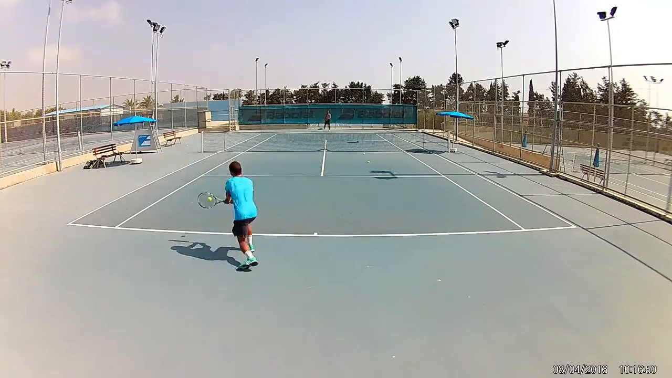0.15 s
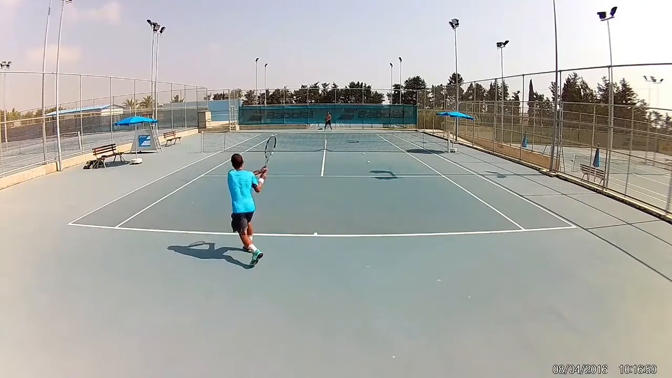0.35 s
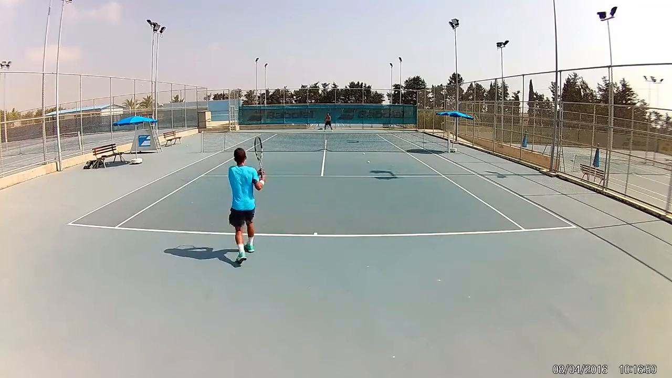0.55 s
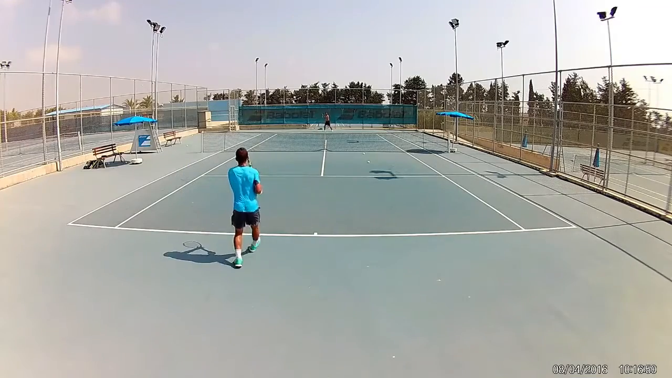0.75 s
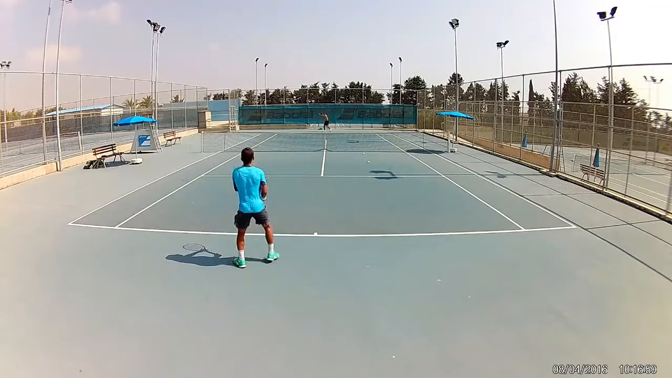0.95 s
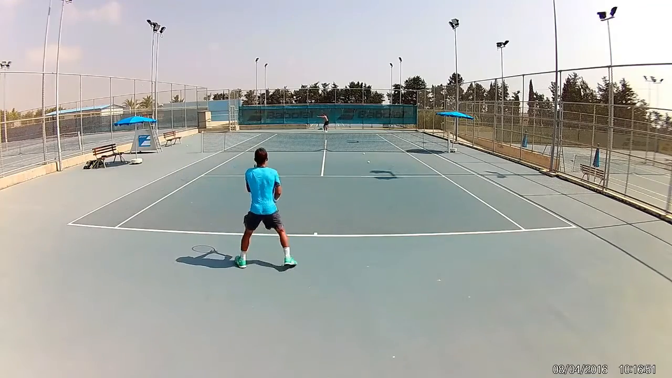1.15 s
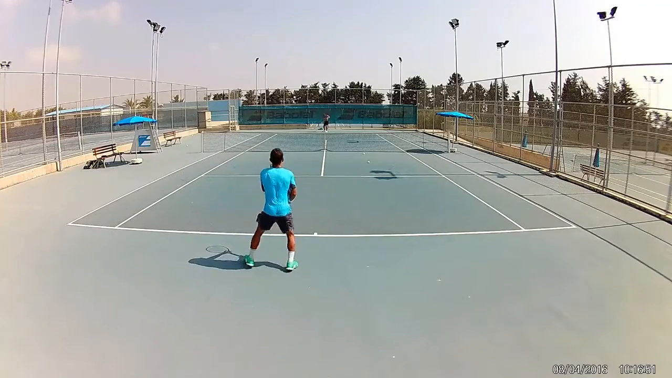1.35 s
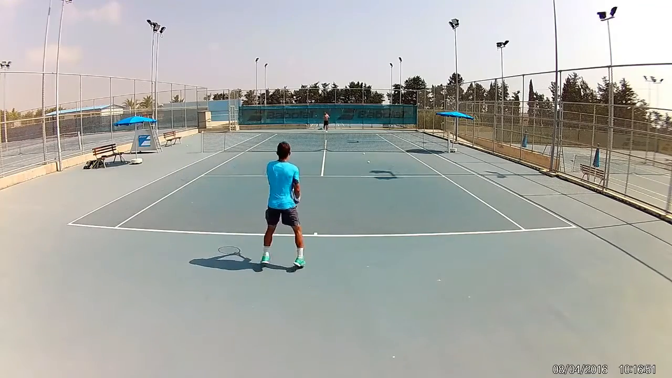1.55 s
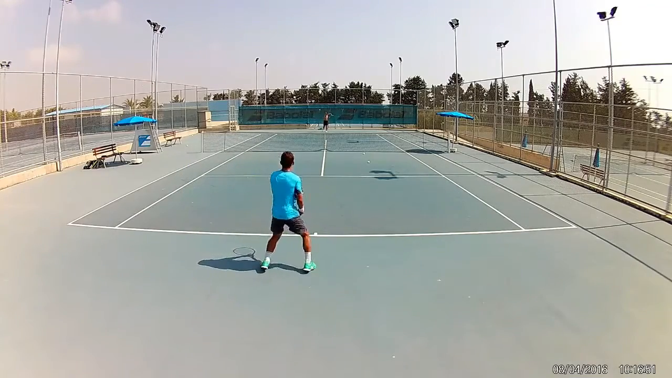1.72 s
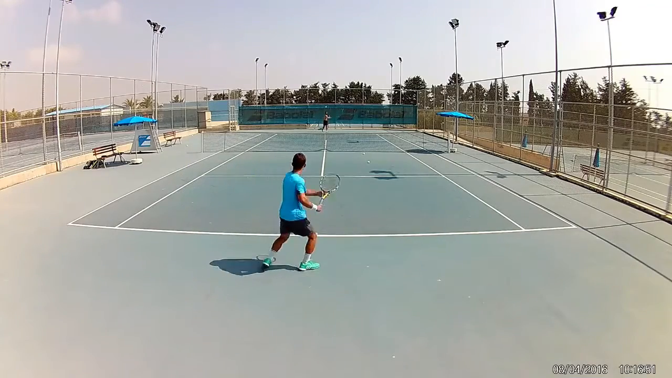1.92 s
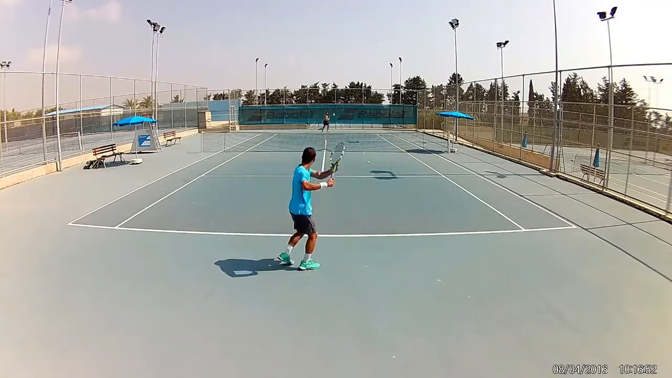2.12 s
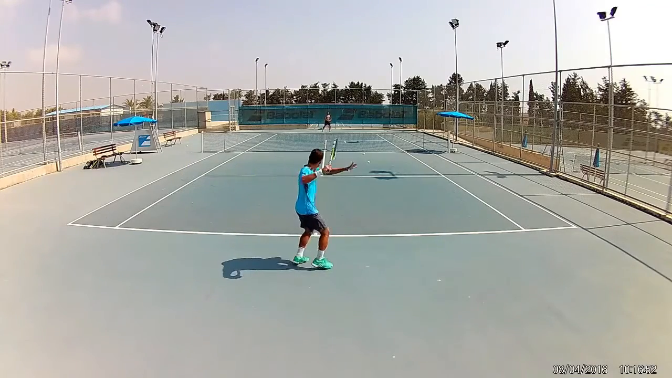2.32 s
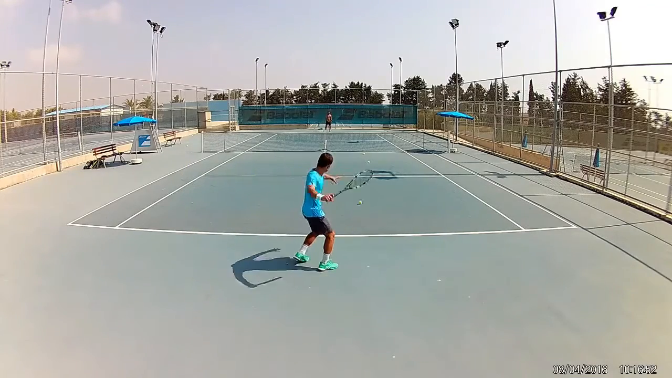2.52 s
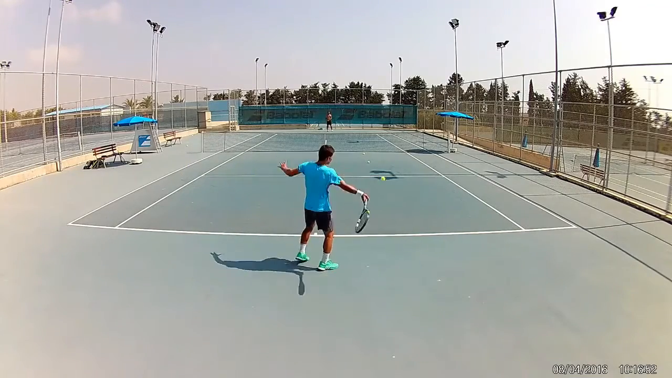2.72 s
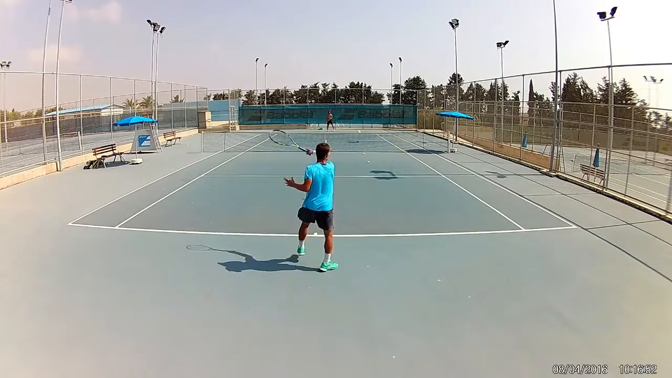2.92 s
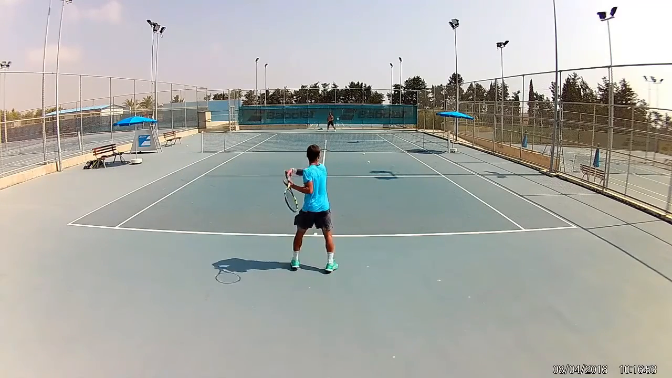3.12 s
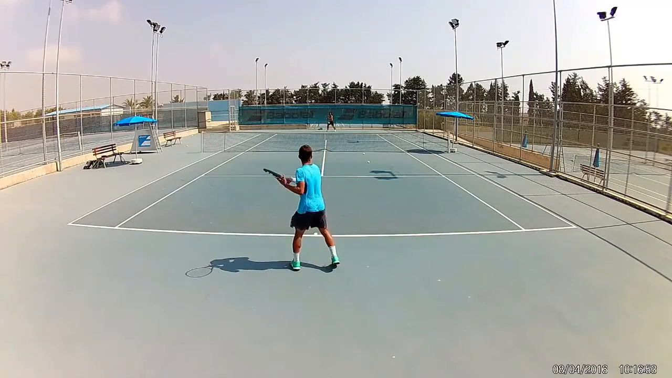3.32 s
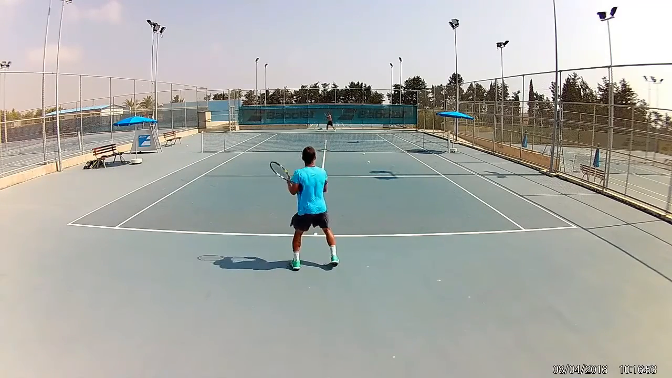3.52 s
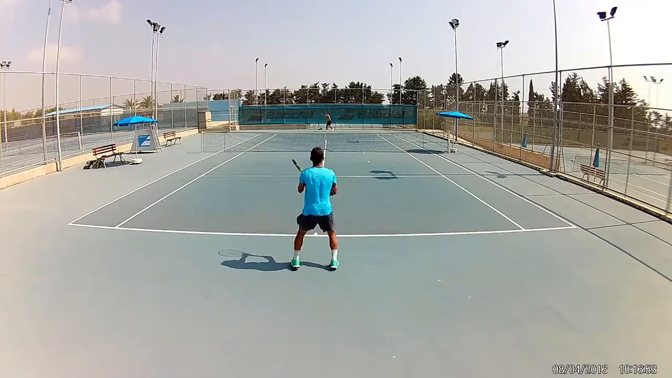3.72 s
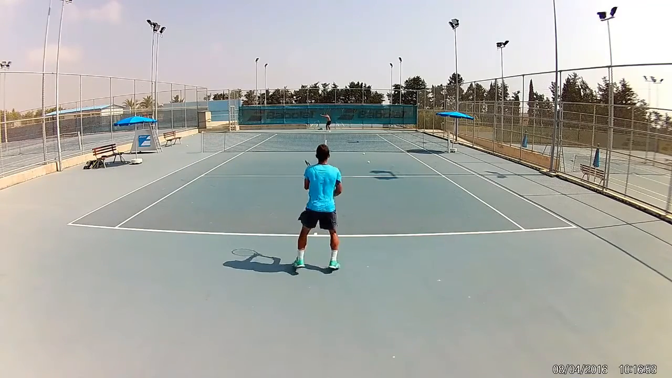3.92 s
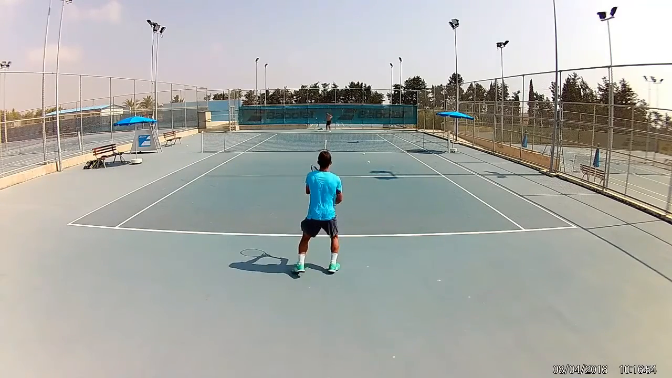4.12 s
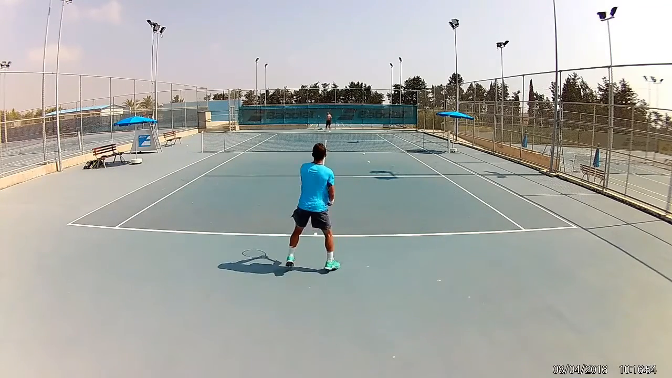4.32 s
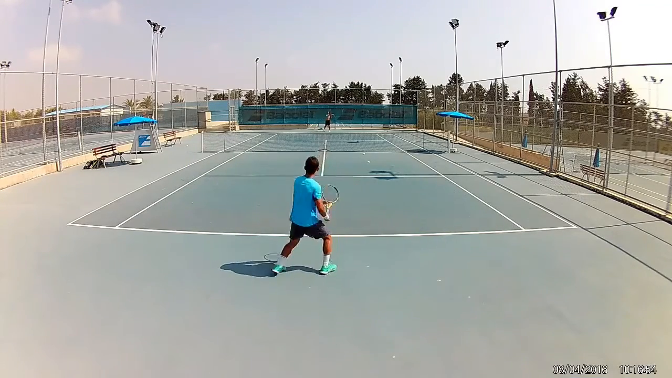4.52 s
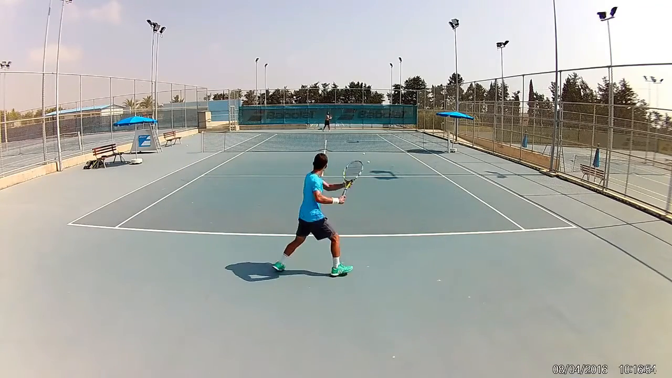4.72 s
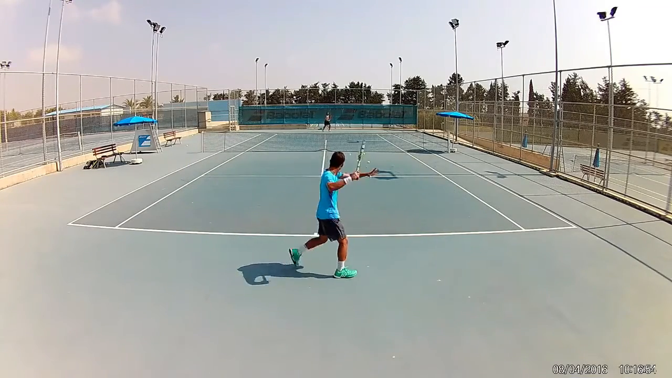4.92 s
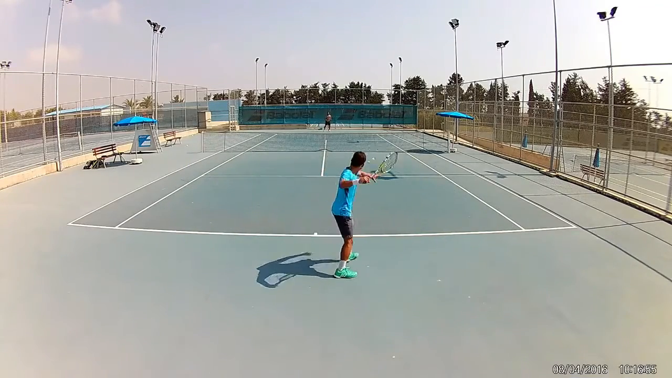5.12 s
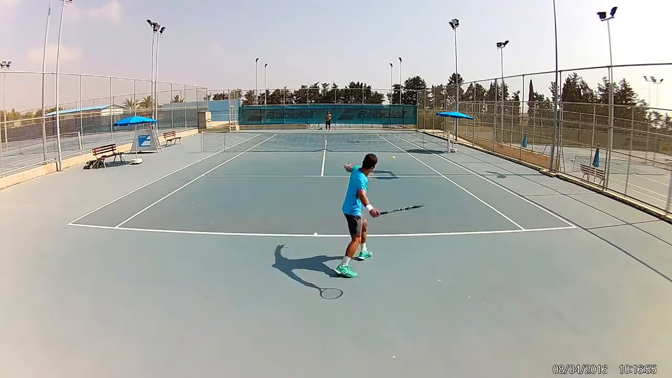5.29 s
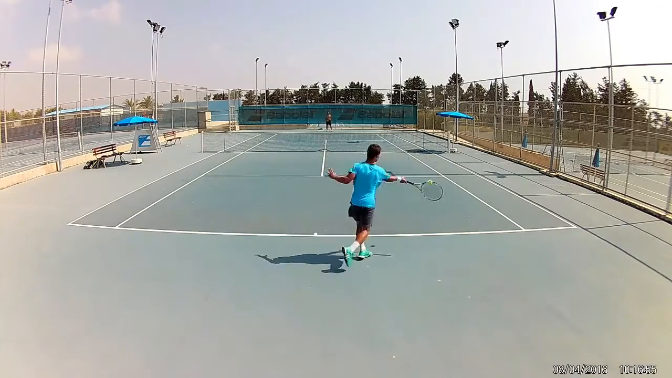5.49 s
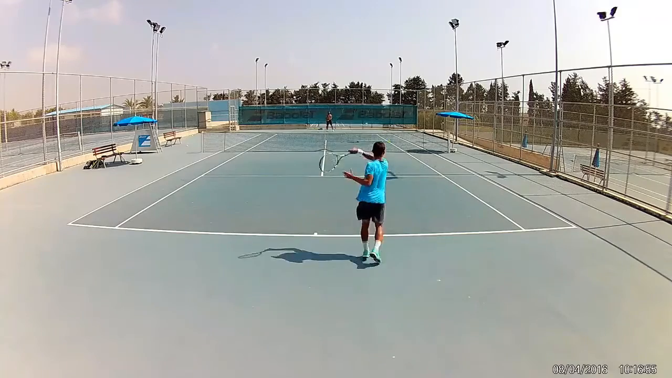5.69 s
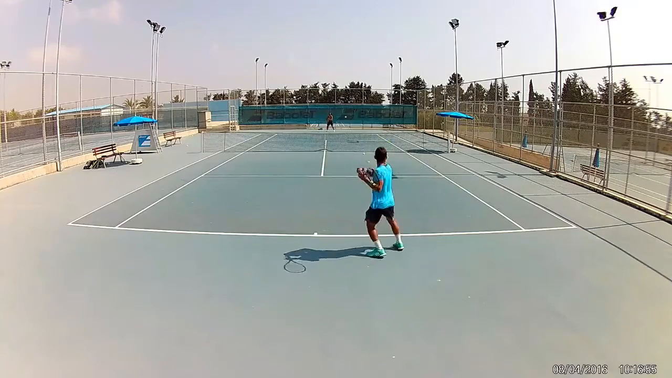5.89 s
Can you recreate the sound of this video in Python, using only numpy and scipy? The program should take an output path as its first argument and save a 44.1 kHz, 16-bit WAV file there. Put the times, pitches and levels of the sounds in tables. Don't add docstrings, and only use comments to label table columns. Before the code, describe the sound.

Heard from behind the near baseline of an outdoor hard court, a close backhand pops early, a duller far stroke answers, then a bounce and a sharp forehand. The exchange repeats with a softer return and bounce. Shoes thud, tap and scuff between hits while low wind buffets the microphone over faint cicadas and distant traffic.

```python
import sys
import numpy as np
from scipy import signal
from scipy.fft import rfft, irfft
from scipy.io import wavfile
from scipy.ndimage import uniform_filter1d

SR = 44100
rng = np.random.default_rng(int(sys.argv[2]) if len(sys.argv) > 2 else 0)


def store_wav(level_fs):
    pcm = np.round(np.clip(np.atleast_2d(level_fs), -1, 1) * 32767)
    wavfile.write(sys.argv[1], SR, pcm.T.astype(np.int16))


def nominal_scale(level):
    x = np.asarray(level, float) / 20
    return 10 ** x


N = 262395

# t/s, kind of blow, level/dB, shell f/Hz, cavity f/Hz, string f/Hz
RALLY = [
    (.3487, "backhand", -18.5, 245, 865, 3260),
    (1.7285, "far stroke", -20.5, 468, 975, 6270),
    (2.6903, "bounce", -25, 306, 1150, 2300),
    (2.9682, "forehand", -18, 335, 765, 4250),
    (4.4678, "far stroke", -25, 430, 900, 6200),
    (5.1813, "bounce", -31.5, 450, 1150, 1800),
    (5.7257, "forehand", -18, 429, 810, 3820),
]
BLOW_MODES = {"backhand": (-4.5, 1.18, -1, -7.5, -21.5), "forehand": (4.5, 1.46, -5, -4, -22),
              "far stroke": (3.5, 1.35, -10, -26, -31), "bounce": (-3.5, .58, -16.5, -20, -35)}
CONTACTS = {"backhand": (1.8, 5.6, 53, .74), "forehand": (3.2, 2.6, 60.5, .78),
            "far stroke": (4.3, 6.0, 70, 1.2), "bounce": (.9, 4.9, 60, .74)}
TOUCHES = {"backhand": (.12, 2.8, 11, 5000), "forehand": (.2, 3.5, 4, 2100), "bounce": (.1, 2.2, .6, 2700),
           "far stroke": (.08, 2.4, 9, 1800)}
REFLECTIONS = {"backhand": (6.5, -13.5, -27, -29, -29), "forehand": (3.5, -17.5, -20.5, -34, -29),
               "far stroke": (-27.5, -0.7, -21.5, -48, -19), "bounce": (-8.5, -8, -22, -39, -31.5)}
RIBS = {"backhand": (1013, -39), "forehand": (950, -42.5), "far stroke": (1010, -49), "bounce": (1110, -46)}


def ball():
    out = np.zeros(N)
    for s, kind, db, shell_hz, cavity_hz, string_hz in RALLY:
        shell_db, upper_ratio, upper_db, crack_db, string_db = BLOW_MODES[kind]
        swell_ms, court_ms, side_ms, spring = CONTACTS[kind]
        linger, *snap = TOUCHES[kind]
        court_db, *wall_dbs = REFLECTIONS[kind]
        far_hz, flutter_db = RIBS[kind]
        upper_hz = upper_ratio * cavity_hz
        body = blow(shell_hz, shell_db, cavity_hz, upper_hz, upper_db, swell_ms, spring, linger)
        add(body, court_ms / 1000, nominal_scale(court_db) * body)
        hit = nominal_scale(db) * (body + crack(crack_db, string_hz, string_db, *snap))
        add(out, s, court(hit, side_ms, far_hz, *wall_dbs, flutter_db))
    return out


def blow(shell_hz, shell_db, cavity_hz, upper_hz, upper_db, swell_ms, spring, linger):
    t = np.arange(2048) / SR
    squash_s = .85 / shell_hz
    shell_swell = burst(t, spring * squash_s) ** max(2 * spring ** 2, 1)
    shell = -nominal_scale(shell_db) * shell_swell * np.cos(2 * np.pi * shell_hz * (t - squash_s))
    ring = burst(t, swell_ms / 1000) ** max(swell_ms / 2, 1)
    ring += linger * burst(t, 0.0067) ** 1.8
    cavity = ring * np.sin(2 * np.pi * cavity_hz * t)
    upper = nominal_scale(upper_db) * burst(t, .0016) * np.sin(2 * np.pi * upper_hz * t)
    return shell + cavity + upper


# f/Hz, level/dB
CRACK = [(500, -6), (1400, 11), (2200, 1.5), (3300, -19), (4500, -29), (6500, -21), (10000, -17.5),
         (12500, -20), (15500, -32)]


def crack(crack_db, string_hz, string_db, snap_ms, treble_db, treble_hz):
    snap_s = snap_ms / 1000
    t = np.arange(2048) / SR
    snap = burst(t, snap_s) ** 2 + .12 * burst(t, .007) ** .7
    spectrum = [(hz, db + treble_db * (hz > treble_hz)) for hz, db in CRACK]
    felt = nominal_scale(crack_db) * noise(spectrum, size=2048)
    string = nominal_scale(string_db) * unit(resonance(rng.standard_normal(len(t)), string_hz, 360))
    return snap * (felt + string)


# f/Hz, level/dB
SCATTER = [(120, -24), (300, 4.5), (550, 1.5), (900, 3), (1450, -6), (2000, -15.5), (4000, -33),
           (7000, -36), (15000, -53)]


def court(hit, side_ms, far_hz, fence_db, side_db, far_db, scatter_db, flutter_db):
    fence_ms, far_ms = 38.6, 169
    t = np.arange(SR // 2) / SR
    walls = np.zeros(len(t))
    for ms, db in (fence_ms, fence_db), (side_ms, side_db), (far_ms, far_db):
        walls[int(ms * SR / 1000)] = nominal_scale(db)
    out = signal.fftconvolve(hit, resonance(walls, 710, 6000))[:len(t)]
    peak = np.abs(hit).max()
    grains = rng.standard_normal((2, len(t))) * (rng.random((2, len(t))) < .2)
    cloud = np.exp(-t / .05) + .2 * np.exp(-t / .13)
    cloud += .4 * np.exp(-((t - fence_ms / 1000 - .004) / .01) ** 2)
    onset = np.clip(t / 0.0028, 0, 1) ** 2
    out += peak * nominal_scale(scatter_db) * onset * cloud * unit(colour(grains[0], SCATTER))
    late_s = t - far_ms / 1000
    flutter = np.clip(t / .05, 0, 1) ** 2 * np.exp(-t / .12)
    flutter += .3 * (late_s > 0) * np.exp(-(late_s / .075) ** 4)
    pitched = unit(resonance(resonance(grains[1], far_hz, 200), far_hz, 200))
    out += peak * nominal_scale(flutter_db) * flutter * pitched
    add(out, 0, hit)
    return out


# t/s, kind of slide, length t/s, grit level/dB,
# squeak f/Hz, squeak level/dB
SCUFFS = [(0.25, "drag", 0.084, -74, 6850, -66), (0.257, "skid", 0.11, -64.5, 10000, -80),
          (0.093, "skid", .05, -77, 3600, -86), (0.762, "drag", 0.026, -65.5, 6500, -70),
          (2.204, "drag", 0.012, -53.5, 2000, -65), (2.346, "drag", 0.058, -57.5, 2570, -59.5),
          (2.513, "skid", 0.03, -70, 3630, -84), (2.856, "skid", 0.048, -73, 3620, -82),
          (3.213, "drag", 0.065, -59, 3880, -63), (4.068, "drag", 0.038, -63, 2960, -77),
          (4.883, "skid", .05, -75, 3270, -73), (5.409, "skid", 0.047, -51, 3600, -48),
          (5.412, "drag", 0.033, -50, 2070, -62), (5.46, "drag", 0.031, -60, 3500, -65),
          (5.818, "drag", 0.12, -76, 550, -48.5), (5.905, "skid", .035, -62, 3880, -74)]
GRIT = {"drag": (0.33, 1.1), "skid": (0.875, 1.27)}


def scuffs():
    out = np.zeros(N)
    t = np.arange(8192) / SR
    for s, kind, length_s, db, squeak_hz, squeak_db in SCUFFS:
        band_hz = squeak_hz * np.array(GRIT[kind])
        slide = np.exp(-(t / length_s) ** 3) + 0.17 * np.exp(-t / 0.037)
        slide *= np.clip(t / 0.0024, 0, 1)
        unevenness_db = 3.0 * rng.standard_normal(len(t) // 64).repeat(64)
        slips = rng.standard_normal(len(t)) * nominal_scale(unevenness_db)
        grit_filter = signal.butter(3, band_hz, "band", fs=SR, output="sos")
        grit = unit(signal.sosfilt(grit_filter, slips) + 0.053 * slips)
        catch = np.exp(-((t - .7 * length_s) / (.25 * length_s)) ** 2)
        squeak = unit(resonance(slips, squeak_hz, 76) + 0.28 * resonance(slips, 0.76 * squeak_hz, 120))
        add(out, s, nominal_scale(db) * slide * grit + nominal_scale(squeak_db) * catch * squeak)
    return out


# t/s, thud level/dB, thud f/Hz, tap level/dB, tap f/Hz
STEPS = [
    (1.009, -58, 65, -50, 670),
    (1.296, -52, 95, -36.5, 1010),
    (1.953, -31, 91, -36.5, 695),
    (2.35, -43, 100, -38, 1250),
    (3.658, -31, 99, -52, 573),
    (3.854, -41, 130, -35.5, 845),
    (4.697, -27.5, 67, -39, 513),
    (5.417, -56, 99, -50, 1550),
]


def steps():
    out = np.zeros(N)
    t = np.arange(8192) / SR
    for s, thud_db, thud_hz, tap_db, tap_hz in STEPS:
        thud = nominal_scale(thud_db) * mode(t, thud_hz, 5.4 / thud_hz)
        add(out, s, thud + nominal_scale(tap_db) * mode(t, tap_hz, 0.0074))
    return out


# t/s, level/dB
WIND = [(0.0, -41.5), (0.89, -41.5), (1.23, -45.5), (1.54, -51.5), (1.9, -49), (2.1, -55.5), (2.29, -57),
        (2.83, -53), (3.13, -48.5), (3.43, -51.5), (4.11, -53), (4.27, -51), (4.54, -49.5), (4.89, -52),
        (5.95, -46.5)]
# f/Hz, level/dB
RUMBLE = [(12, -54), (25, -1), (62, 3), (100, -6), (200, -36), (400, -27)]
# f/Hz, level/dB
FLUTTER = [(60, -1.5), (130, 2.5), (280, -5.5), (500, -12), (900, -21.5), (2000, -49)]


def wind():
    gust_db = curve(WIND, 1)
    rumble = nominal_scale(-17 + 0.63 * gust_db + 1.4 * walk(12)) * noise(RUMBLE)
    return rumble + nominal_scale(gust_db - 1.0 + 2.9 * walk(35)) * noise(FLUTTER)


# f/Hz, width f/Hz, level/dB
CICADA_BANDS = [(4460, 320, -8), (6760, 270, -20)]


def cicadas():
    throb = np.sin(2 * np.pi * np.cumsum(5.7 + .5 * walk(1.5)) / SR)
    buzz = rng.standard_normal(N) * nominal_scale(2.0 * walk(170))
    bands = np.zeros(N)
    for hz, width_hz, db in CICADA_BANDS:
        bands += nominal_scale(db) * unit(resonance(resonance(buzz, hz, width_hz), hz, width_hz))
    level_db = -65 + 1.5 * walk(0.27) + 2.6 * throb
    return nominal_scale(level_db) * bands


# f/Hz, level/dB
AIR = [(150, -18), (250, -5), (466, -13), (1300, -10.5), (1830, -22), (2300, -19), (3730, -34.5),
       (4510, -19.5), (5850, -35), (6840, -36.5), (7990, -43), (12500, -40), (15700, -44.5)]


def air():
    return nominal_scale(-50.5 + .1 * curve(WIND, 1) + 0.81 * walk(11.0)) * noise(AIR)


# t/s, level/dB
ENGINE = [(0, -69), (4.8, -56.5), (5.1, -58), (5.7, -52.5), (5.95, -73)]


def engine():
    return nominal_scale(curve(ENGINE, 1)) * unit(resonance(rng.standard_normal(N), 135, 5.2))


def curve(table, column):
    rows = np.array(table)
    return np.interp(np.arange(N) / SR, rows[:, 0], rows[:, column])


def unit(x):
    return x / np.sqrt(np.mean(x ** 2))


def colour(x, shape):
    hz = np.arange(len(x) // 2 + 1) * SR / len(x) + 1
    points = np.array(shape, float)
    gain = nominal_scale(np.interp(np.log(hz), np.log(points[:, 0]), points[:, 1], -90, -90))
    return irfft(rfft(x) * gain, len(x))


def noise(shape, size=N):
    return unit(colour(rng.standard_normal(size), shape))


def resonance(x, hz, width_hz):
    return signal.lfilter(*signal.iirpeak(hz, hz / width_hz, SR), x)


def walk(rate_hz):
    k = int(SR / rate_hz)
    held = np.repeat(rng.standard_normal(N // k + 1), k)
    return unit(uniform_filter1d(uniform_filter1d(held, k), k)[:N])


def mode(t, hz, t60):
    return np.sin(2 * np.pi * hz * t) * np.exp(-np.log(1000) * t / t60)


def burst(t, peak_s):
    return (t / peak_s) ** 2 * np.exp(2 - 2 * t / peak_s)


def add(out, s, x):
    i = int(s * SR)
    out[i:i + len(x)] += x[:max(len(out) - i, 0)]


# f/Hz, level/dB
MIC = [(20, -3), (4500, 3), (7000, -3.5), (7950, -27), (9000, -10), (12500, -17.5), (15700, -32)]


def scene():
    sharp = colour(ball() + scuffs() + steps(), MIC)
    return (sharp + wind() + cicadas() + air() + engine())[None]


def low_pass(x):
    return signal.sosfilt(signal.butter(12, 16260, fs=SR, output="sos"), x)


# f/Hz, peak level/dB
WHINE = [(12742, -90), (12820, -89.5)]


def record(dry):
    t = np.arange(N) / SR
    whine = sum(nominal_scale(db) * np.sin(2 * np.pi * hz * t) for hz, db in WHINE)
    top_cut = signal.ellip(10, .2, 70, 16100, fs=SR, output="sos")
    mix = signal.sosfilt(top_cut, dry + whine)
    return low_pass(mix)


dry = scene()
out = record(dry)
store_wav(out)
```